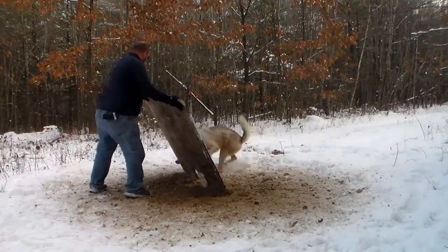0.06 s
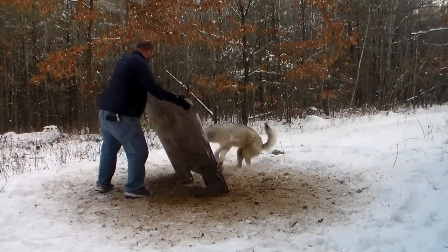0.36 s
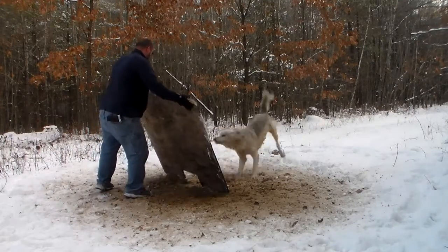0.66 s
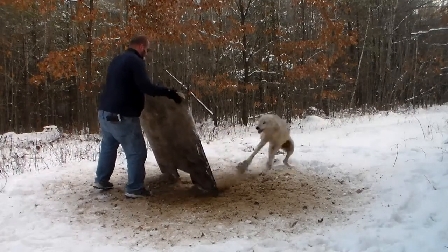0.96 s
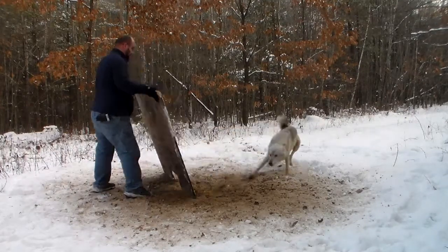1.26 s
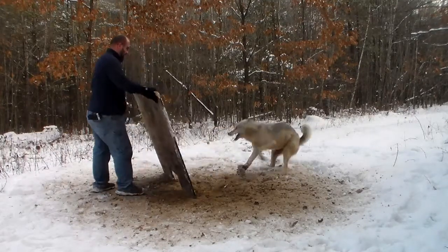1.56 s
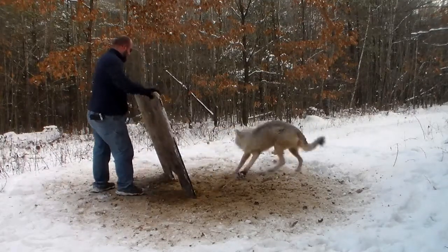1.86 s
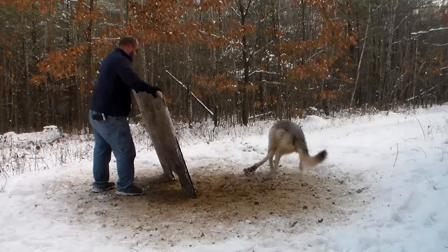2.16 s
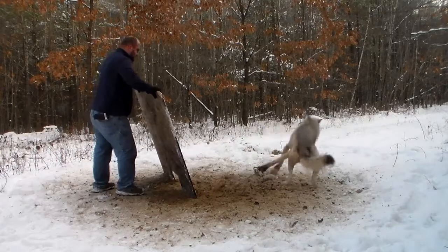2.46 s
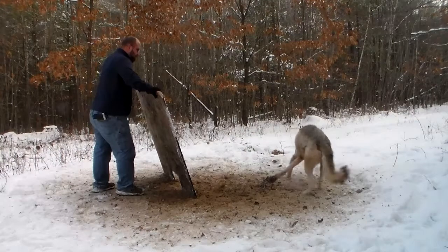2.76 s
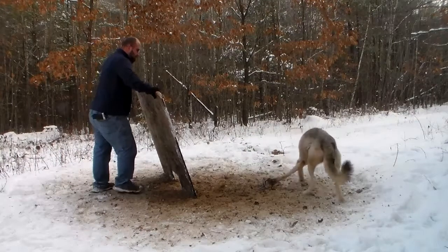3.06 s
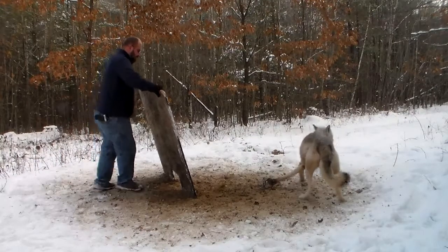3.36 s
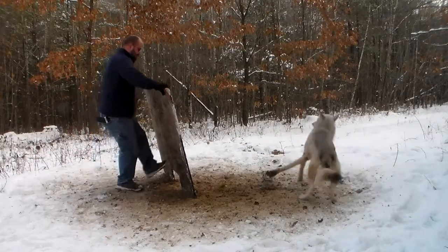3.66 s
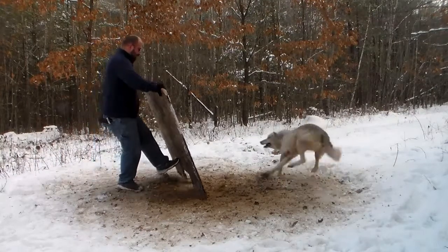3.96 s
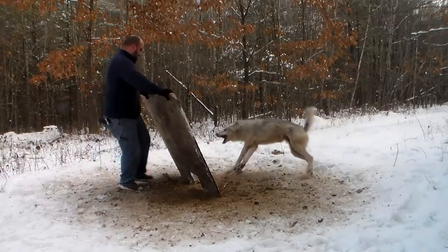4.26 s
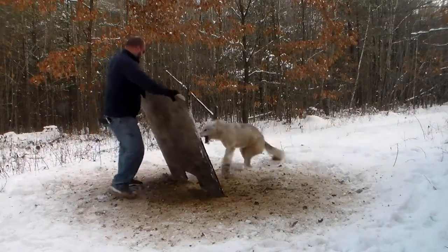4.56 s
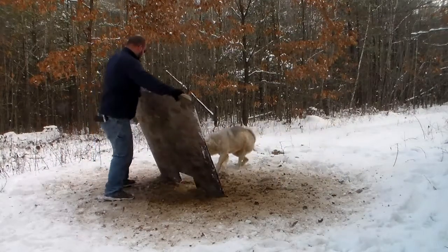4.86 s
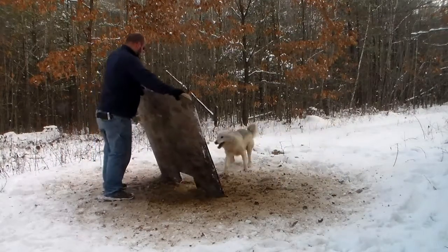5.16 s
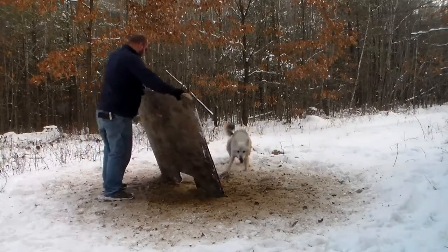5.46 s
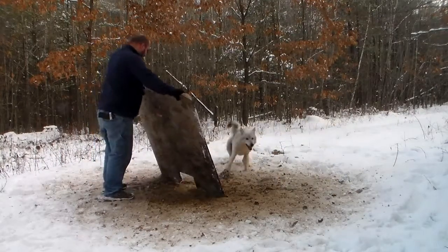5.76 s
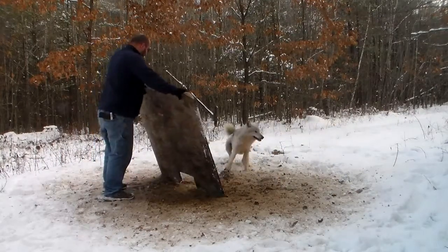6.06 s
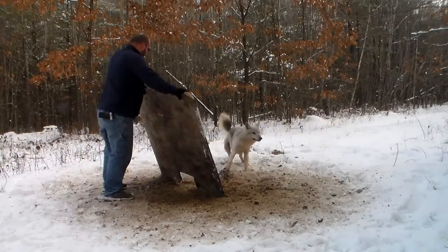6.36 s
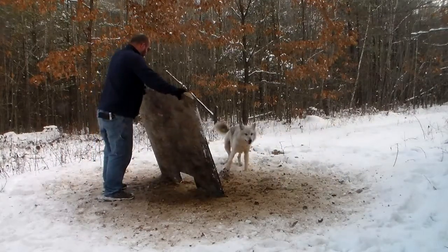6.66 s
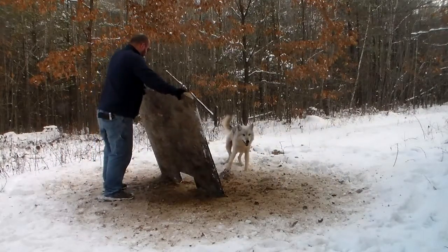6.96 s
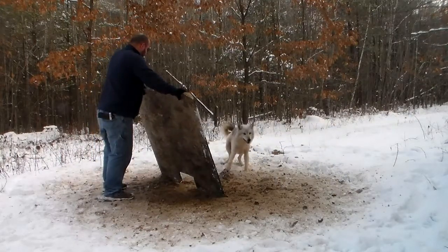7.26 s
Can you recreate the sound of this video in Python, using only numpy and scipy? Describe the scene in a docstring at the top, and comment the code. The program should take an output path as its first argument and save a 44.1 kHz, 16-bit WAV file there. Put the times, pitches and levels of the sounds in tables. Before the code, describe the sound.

A steel chain clicks and clinks as a trapped wolf lunges and scuffs in snow, while a wooden board scrapes over frozen ground.

```python
"""A steel chain and foothold trap click and clink as a trapped wolf lunges about a snowy clearing,
a few metres in front of a stereo microphone. Links snap taut and ring the trap; slack ones tick between.
Paws thud and scuff in snow and dirt. A man drags a wooden board over the frozen ground, where its edge
scrapes and groans, and kicks it once. The trees give a faint echo; under it all lie a low hum and a
soft hiss."""
import sys
import numpy as np
from scipy import signal
from scipy.fft import rfft, irfft, next_fast_len
from scipy.io import wavfile
from scipy.ndimage import map_coordinates

SR = 44100
rng = np.random.default_rng(int(sys.argv[2]) if len(sys.argv) > 2 else 0)


def transcribe(u):
    """Save the signal u as a 16-bit wav file named by the first command-line argument.

    u: samples, shape (n,) or (channels, n), limited to [-1, 1]; the rate is SR.
    q: integer samples, one column per channel.
    """
    v = np.clip(np.atleast_2d(u).T, -1, 1)
    q = np.round(v * 32767).astype(np.int16)
    wavfile.write(sys.argv[1], SR, q)


N = 331367


def amp(db):
    """Decibels to gain."""
    return 10 ** (np.asarray(db) / 20)


def unit(x):
    """x scaled to rms 1."""
    return x / np.sqrt(np.mean(x ** 2) + 1e-20)


def along(points, hz):
    """(Hz, value) points read on a log frequency axis."""
    knots_hz, values = np.transpose(points)
    return np.interp(np.log(hz + 1), np.log(knots_hz + 1), values)


def during(rows):
    """1 from the first row's time to the last row's, with 50 ms fades outside."""
    t = np.arange(N) / SR
    return np.clip(np.minimum(t - rows[0][0], rows[-1][0] - t) / .05 + 1, 0, 1)


def wobble(rate):
    """A smooth random curve with rate knots a second."""
    knots = rng.standard_normal(int(N * rate / SR) + 4)
    return map_coordinates(knots, [np.arange(N) * rate / SR])


def filtered(x, response):
    """x through a complex frequency response."""
    size = next_fast_len(N + SR // 2)
    return irfft(rfft(x, size) * response(np.fft.rfftfreq(size, 1 / SR)), size)[..., :N]


def coloured(x, spectrum):
    """x shaped by (Hz, dB) points, at rms 1."""
    return unit(filtered(x, lambda hz: amp(along(spectrum, hz))))


def minimum_phase(gain):
    """The fastest-starting pulse that has this spectrum."""
    cepstrum = irfft(np.log(gain + 1e-6))
    half = len(cepstrum) // 2
    cepstrum[1:half] *= 2
    cepstrum[half + 1:] = 0
    return irfft(np.exp(rfft(cepstrum)))


def add(track, start, sound):
    """Lay a sound into the track, start seconds in."""
    i = max(round(start * SR), 0)
    track[i:i + len(sound)] += sound[:N - i]


def grains(per_s, scatter_db, smooth):
    """Tiny fractures at random times and sizes, over a share of smooth sliding noise."""
    size = amp(scatter_db * np.minimum(rng.exponential(size=N), 4))
    breaks = (rng.random(N) < per_s / SR) * size * rng.choice([-1, 1], N)
    return unit(unit(breaks) + smooth * rng.standard_normal(N))


# The quiet of the clearing. Each row: frequency in Hz, relative level in dB.
AIR_SPECTRUM = [(12, -19), (22, -32), (34, -25), (44, -20.5), (60, -9), (86, -17.5), (214, -22.5),
                (450, -25.5), (719, -28), (1690, -32), (10100, -37), (12300, -35), (14500, -43.5)]
# How alike that air is at the two ports. Each row: frequency in Hz, left-right correlation.
AIR_LIKENESS = [(30, 0.27), (60, 0.11), (130, 0.17), (290, 0.062), (630, 0.065), (1400, 0.092),
                (6000, 0.01)]


def air_and_hum(air_db=-63, hum_db=-59.5, hum_hz=30.5):
    """Still winter air and microphone hiss spread wide, with a low wavering hum in the centre."""
    def mid_and_side(hz):
        side_gain = np.tan(np.arccos(along(AIR_LIKENESS, hz)) / 2)
        return amp(along(AIR_SPECTRUM, hz)) * np.array([np.ones_like(hz), side_gain])

    mid, side = filtered(rng.standard_normal((2, N)), mid_and_side)
    air = np.array([mid + side, mid - side]) / np.std(mid)
    phase = 2 * np.pi * np.cumsum(hum_hz + 1.64 * wobble(9)) / SR
    hum = unit(np.sin(phase) * amp(1.7 * wobble(9)))
    return amp(air_db) * air + amp(hum_db) * hum


# Two drags over the frozen ground, a curve for each. Each row: time in seconds, relative level in dB.
BOARD_DRAGS = [
    [(0.0, -61), (0.142, -72), (0.148, -47.5), (0.222, -40), (0.316, -48.5), (0.396, -46.5), (0.658, -51.5),
     (0.684, -58), (0.898, -63), (1.054, -56), (1.25, -77)],
    [(4.3, -64), (4.34, -69.5), (4.476, -51), (4.656, -49.5), (4.688, -76), (4.694, -49), (4.76, -40),
     (4.822, -47), (4.858, -66), (4.874, -50.5), (5.0, -90)],
]
# The wood's resonances. Each row: frequency in Hz, width in Hz, gain in dB in drag one, then in drag two.
BOARD_MODES = [(139, 180, -2.5, -2), (259.3, 25, 4.5, -1), (462, 250, -2, -7), (624, 31, -10, 5.5),
               (738, 29, -2, -0.5), (1066, 36, -2, 1.5), (1221, 21, -1.5, -3.5), (1540, 880, -13, -35),
               (2440, 230, -8, -7)]


def board_scrape(drag_db=-1, grit_db=-22):
    """Grit catches on the board's edge; each resonance is fed by its own stream of catches."""
    out, t = np.zeros(N), np.arange(N) / SR
    for k, drag in enumerate(BOARD_DRAGS):
        grit = grains(per_s=830, scatter_db=1.6, smooth=0.99)
        scrape = amp(grit_db) * filtered(grit, lambda f: f / (60 + f) / (1 + (f / 1300) ** 4))
        for hz, width, *gains_db in BOARD_MODES:
            def mode(f):
                resonance = 1j * f * width / (hz * hz - f * f + 1j * f * width)
                return resonance / (1 + (f / (2 * hz)) ** 4)

            catches = grains(per_s=900, scatter_db=4.9, smooth=0.63)
            scrape += amp(gains_db[k]) * filtered(catches, mode)
        level_db = np.interp(t, *np.transpose(drag)) + drag_db + 3.6 * wobble(35)
        out += during(drag) * amp(level_db) * unit(scrape)
    return out


# Paws sliding in snow and dirt. Each row: start and length in seconds, rustle and spray in relative dB.
PAW_SLIDES = [(.01, .09, -53, -63), (0.127, 0.085, -43, -54.5), (.26, 0.41, -49.5, -58.5),
              (0.69, 0.12, -60.5, -61), (0.981, 0.028, -54.5, -54), (1.122, 0.032, -56, -55),
              (1.366, 0.038, -59.5, -69), (1.503, 0.15, -59.5, -64), (1.789, 0.065, -58.5, -66),
              (1.977, 0.028, -58, -63.5), (2.25, 0.012, -59, -58), (2.372, 0.044, -62.5, -64.5),
              (2.528, 0.015, -67, -68), (2.696, .02, -65, -67), (2.856, 0.0089, -73, -63.5),
              (3.018, 0.085, -69.5, -63), (3.6, 0.017, -64.5, -69), (3.794, 0.064, -58, -63),
              (3.94, 0.012, -62, -66), (4.081, 0.148, -59.5, -58), (4.439, 0.082, -49, -63),
              (4.57, 0.073, -52, -59), (4.75, 0.05, -43.5, -52.5), (4.865, 0.076, -60, -63),
              (5.103, 0.014, -62, -62), (5.187, .01, -63, -69), (5.278, 0.013, -63, -68),
              (5.421, 0.016, -60.5, -69), (5.788, 0.012, -71, -85)]
BUSY_DB = -62  # above this rustle, the paws stir the slack chain


def paw_slides(rise_db_per_s=335, fall_db_per_s=204):
    """Gains of rustle and spray over time: each slide bites quickly, holds and settles more slowly."""
    t, power = np.arange(N) / SR, np.zeros((2, N))
    for start, length, rustle_db, spray_db in PAW_SLIDES:
        near = slice(max(round((start - .5) * SR), 0), round((start + length + .5) * SR))
        fade_db = rise_db_per_s * np.maximum(start - t[near], 0)
        fade_db += fall_db_per_s * np.maximum(t[near] - start - length, 0)
        power[:, near] += np.outer(amp([rustle_db, spray_db]), amp(-fade_db)) ** 2
    return np.sqrt(power)


# Churned snow and the fine spray off it. Each row: frequency in Hz, relative level in dB.
RUSTLE_SPECTRUM = [(500, -5.5), (1100, -4.5), (1650, -4), (2000, -5.5), (2500, 1), (3050, -2), (3400, 2.5),
                   (4000, 3.5), (4600, -3.5), (6000, -13), (6950, -13.5), (7900, -24), (11000, -58)]
SPRAY_SPECTRUM = [(2000, -29), (5000, -6), (7000, -1.5), (8100, -9), (9700, -2), (12000, -8), (14500, -6)]


def scuffs(rustle, spray, spray_db=-1, patter_db=-66, shuffle_db=-75, dust_db=-73):
    """Crust and grit break under sliding paws and throw up a spray; the soft pads patter dully."""
    grit = coloured(grains(per_s=2600, scatter_db=2.9, smooth=.65), RUSTLE_SPECTRUM)
    churn = (rustle + amp(shuffle_db)) * amp(2.97 * wobble(90)) * grit
    dust = coloured(grains(per_s=3300, scatter_db=3, smooth=0.59), SPRAY_SPECTRUM)
    fine_spray = (spray + amp(dust_db)) * amp(spray_db) * dust
    pad_spectrum = [(45, -14), (70, -2), (150, 0), (280, -10), (600, -21), (1500, -45)]  # Hz, dB
    pads = amp(3 * wobble(14)) * coloured(rng.standard_normal(N), pad_spectrum)
    # the harder the paws work, the heavier they fall: 0.18 dB for each dB of rustle
    patter = amp(patter_db) * (rustle / amp(BUSY_DB)) ** 0.18 * pads
    return during(PAW_SLIDES) * (churn + fine_spray + patter)


def slack_ticks(rustle, per_s=20, db=-54.5, hz=3850, octaves=0.32, treble_db=-16, ring_db=-15):
    """Faint contacts for the chain at random moments, wherever the paws churn hard enough to stir it."""
    chances = rng.random((300, 4))
    share = per_s * N / SR / len(chances)
    return [(when * N / SR, db + 8 * (size - .5), hz * 2 ** (.5 * (pitch - .5)),
             octaves, treble_db, ring_db)
            for when, size, pitch, odds in chances
            if odds < share and rustle[int(when * N)] > amp(BUSY_DB)]


# The bright edge of a steel click. Each row: frequency in Hz, relative level in dB.
SNAP_SPECTRUM = [(300, -12.5), (1200, -3.5), (3000, 2.5), (5500, -2), (6800, 2.5), (8100, -13.5), (9000, 0),
                 (10000, -1), (11500, -6.5), (14500, -19)]


def contact_pulse(centre_hz, octaves, treble_db):
    """One link strikes another; the hardness of the contact sets the band that is excited."""
    hz = np.fft.rfftfreq(1024, 1 / SR) + 1
    snap = amp(along(SNAP_SPECTRUM, hz))
    snap /= np.linalg.norm(snap[hz > 8200])
    band = np.exp(-(np.log2(hz / centre_hz) / (2.05 * octaves)) ** 2)
    pulse = minimum_phase(np.hypot(band / np.linalg.norm(band), amp(treble_db) * snap))
    # each frequency takes its own path through the links, up to two milliseconds long
    delay = np.interp(hz, np.linspace(0, SR / 2, 30), .0002 + .0018 * rng.random(30) ** 2)
    pulse = irfft(rfft(pulse) * np.exp(-2j * np.pi * np.cumsum(delay) * SR / len(pulse)))
    t = np.arange(len(pulse)) / SR
    return pulse * np.clip(2 - t / .005, 0, 1)


def steel_ring(modes, t, detune):
    """Damped modes, at new strengths for each blow; the grip of the chain shifts their pitch."""
    ring = np.zeros(len(t))
    for hz, db, t60 in modes:
        decay = amp(db + rng.normal(0, 1.1) - 60 * t / t60)
        ring += decay * np.sin(2 * np.pi * (hz * rng.normal(1, detune) * t + rng.random()))
    return ring * (1 - np.exp(-t / 0.00058))


# The chain jerks taut, steel on steel. Each row: start in seconds, click level in dB, centre in Hz,
# spread in octaves, then the treble and the trap's ring in relative dB.
CHAIN_JERKS = [(0.102, -27, 2710, 0.13, -26.5, -19), (.1306, -38, 3500, 0.25, -21, -13),
               (0.1503, -27.5, 3300, 0.31, -25.5, -23), (.215, -34, 2900, .38, -21, -21),
               (0.263, -28.5, 3700, .22, -24, -14.5), (0.3438, -34, 2980, 0.36, -12.5, -22),
               (.4795, -29.5, 3100, .31, -26, -27), (.483, -32, 2980, 0.56, -22, -22),
               (0.493, -29.5, 3280, .28, -22, -14), (0.6231, -29.5, 3130, 0.32, -19.5, -17),
               (.679, -43, 3440, 0.67, 1, -14), (0.692, -32, 3770, 0.13, -13, -31),
               (0.9664, -23.5, 5000, 0.11, -15, -30), (.967, -27.5, 3200, 0.14, -14.5, -23),
               (1.0336, -43.5, 3590, .44, -15, -23), (1.0631, -26.5, 2640, 0.31, -19, -19),
               (1.0836, -45, 2840, 0.52, -14, -25), (1.1173, -46, 3620, 0.41, -14, -20),
               (1.2935, -47, 3830, 0.18, -23, -23), (1.4773, -34.5, 3130, 0.44, -16, -25),
               (1.4806, -30, 3550, 0.28, -12, -16), (1.4848, -25.5, 2850, 0.34, -16.5, -18),
               (1.4938, -39, 3000, .44, -14, -28), (1.7993, -27.5, 4000, 0.082, -11.5, -19),
               (1.8035, -26.5, 3070, 0.3, -25, -18), (1.9112, -50, 3630, 0.22, -16, -13),
               (2.0623, -31.5, 3270, 0.29, -27, -25), (2.1048, -47.5, 3780, 0.15, -18, -10),
               (2.2347, -30, 2800, .25, -14, -19), (2.2379, -32.5, 3440, 0.29, -12, -6),
               (2.534, -38.5, 4120, 0.071, -12.5, -11), (2.6713, -38, 3140, .29, -10.5, -16),
               (3.7413, -48.5, 3420, 0.19, -20, -25), (3.7477, -46, 3230, 0.51, -23, -15),
               (3.8185, -42, 3700, 0.13, -9, -26), (3.8218, -35.5, 2070, .43, -17, -21),
               (4.018, -54, 4100, 0.091, -15, -8), (4.0502, -42.5, 3670, 0.15, -15.5, -12),
               (4.0774, -41, 3980, 0.095, -13, -24), (4.1445, -35.5, 3740, 0.16, -15, -17),
               (4.1817, -40, 3300, 0.31, -18, -11), (4.234, -40.5, 3280, 0.27, -27, -26),
               (4.34, -47, 2710, .28, -19.5, -20), (4.3773, -44, 3000, 0.37, -29, -13),
               (4.4639, -30, 3840, 0.13, -13, -24), (4.5083, -36, 3300, 0.27, -31, -17),
               (4.6112, -36, 4070, 0.32, -11, -12), (4.7683, -22.5, 2830, 0.11, -16.5, -20),
               (4.8152, -41.5, 3880, .083, -24, -12), (4.878, -44, 3900, 0.31, -21, -23),
               (4.9303, -40.5, 3830, .19, -19, -18), (5.1855, -38.5, 3760, 0.22, -14, -27),
               (5.355, -49, 4700, 0.2, -16, -22), (5.418, -42.5, 3070, 0.33, -25, -25),
               (5.4274, -28, 2810, 0.28, -19, -33)]
# The struck trap's modes. Each row: frequency in Hz, relative level in dB, seconds to fall 60 dB.
TRAP_MODES = [(2560, 3, 0.029), (3700, -8, .05), (4125, 12.5, 0.038), (4800, -7.5, 0.092),
              (6340, -7, 0.058), (7080, -6.5, 0.07), (9060, -6, 0.061)]


def chain(rustle, chatter_db=-7, chatter_t60=0.021, shiver_db=-20, shiver_t60=0.1, ring_lift_db=1):
    """Links snap together in millisecond clicks; their neighbours chatter and the trap rings briefly."""
    out, t = np.zeros(N), np.arange(SR // 3) / SR
    for start, db, centre_hz, octaves, treble_db, ring_db in CHAIN_JERKS + slack_ticks(rustle):
        pulse = contact_pulse(centre_hz, octaves, treble_db)
        force = signal.unit_impulse(len(t))
        for rattle_db, t60 in (chatter_db, chatter_t60), (shiver_db, shiver_t60):
            rattle = rng.standard_normal(len(t)) * amp(-60 * t / t60) * (1 - np.exp(-t / 0.00067))
            force += amp(rattle_db) * rattle / np.linalg.norm(rattle)
        click = signal.fftconvolve(force, pulse)[:len(t)]
        click *= np.sqrt(.003 * SR) / np.linalg.norm(click)  # the energy of 3 ms at rms 1
        ring = amp(ring_db + ring_lift_db) * steel_ring(TRAP_MODES, t, detune=0.0092)
        add(out, start, amp(db) * (click + ring))
    return out


# Blows on the ground and the board. Each row: start in seconds, level in dB, pitch in Hz.
BLOWS = [(0.212, -35.5, 156), (.405, -38.5, 147), (0.52, -45, 75.6), (0.619, -45, 72), (0.737, -47, 89),
         (1.038, -43, 143), (1.599, -47, 152), (1.801, -39.5, 79), (2.369, -42.5, 139), (3.099, -47, 143),
         (3.373, -46, 317), (3.417, -50, 385), (3.821, -38.5, 86), (3.823, -42, 170), (3.975, -36, 166),
         (4.014, -49.5, 111), (4.466, -41, 128), (4.618, -39, 143.4), (4.749, -49, 75), (4.863, -46, 129),
         (5.261, -40.5, 180)]


def thuds(dirt_db=-9, decay_cycles=11.4):
    """Each heavy blow is a short low swing with a puff of dull noise; the lower, the longer."""
    out, t = np.zeros(N), np.arange(SR // 4) / SR
    dirt = coloured(rng.standard_normal(N), [(40, -14), (150, -2), (450, -13.5), (900, -21), (2500, -30)])
    for start, db, hz in BLOWS:
        puff = amp(dirt_db) * dirt[round(start * SR):][:len(t)]
        envelope = amp(db - 60 * t * hz / decay_cycles) * (1 - np.exp(-t / 0.00034))
        add(out, start, envelope * (np.sin(2 * np.pi * hz * t) + puff))
    return out


# Hoarse groans in the first drag. Each row: start and length in seconds, first and last pitch in Hz,
# level in dB.
BOARD_GROANS = [(0.292, 0.1, 491, 405, -58), (0.373, 0.15, 465, 330, -49), (0.476, 0.16, 450.6, 361.4, -49),
                (0.534, 0.156, 331, 282, -54), (0.609, 0.079, 476, 406, -51)]


def board_groans(overtone_db=-9, jitter=0.022, rough_db=3):
    """Pressed hard, the board's edge sticks and slips in short, rough, overlapping, falling tones."""
    out = np.zeros(N)
    for start, length, first_hz, last_hz, db in BOARD_GROANS:
        progress = np.linspace(0, 1, round(length * SR))
        glide_hz = first_hz + (last_hz - first_hz) * progress
        pitch = glide_hz * (1 + jitter * wobble(134)[:len(progress)])
        phase = 2 * np.pi * np.cumsum(pitch) / SR
        tone = np.sin(phase) + amp(overtone_db) * np.sin(3 * phase)
        roughness = amp(rough_db * wobble(91)[:len(progress)])
        swell = np.sqrt(np.abs(np.sin(np.pi * progress)))
        add(out, start, amp(db) * swell * unit(tone * roughness))
    return out


# Paws and boots sinking in, and the man's kick at the board at 3.824 s. Each row: peak time in seconds,
# relative level in dB, half-width in seconds.
STEPS_AND_KICK = [(0.922, -47, 0.018), (1.294, -49, .008), (1.57, -55.5, 0.083), (1.998, -55.5, 0.038),
                  (2.383, -53, 0.021), (2.858, -52.5, 0.0084), (3.109, -51, .02), (3.339, -52, 0.01),
                  (3.378, -53.5, 0.012), (3.603, -52, 0.014), (3.824, -34, 0.0022), (3.977, -53.5, .0045),
                  (4.142, -50, 0.016), (4.184, -46, 0.012), (4.893, -48.5, 0.011), (5.102, -53, 0.027)]
# Crushed crust and dirt. Each row: frequency in Hz, relative level in dB.
CRUNCH_SPECTRUM = [(60, 10.5), (300, -10), (600, -2.5), (900, -9), (1500, -3.5), (2600, -9), (4200, -7),
                   (6000, -21), (8000, -16), (9800, -25), (14500, -40)]


def crunches_and_kick(step_db=-2):
    """A deep step breaks through the crust and crunches in the dirt; the kick at the board crunches the same
    way."""
    t = np.arange(N) / SR
    weight = sum(amp(db + step_db) * np.exp(-((t - peak) / width) ** 2) for peak, db, width in STEPS_AND_KICK)
    return weight * coloured(grains(per_s=2500, scatter_db=2.8, smooth=1), CRUNCH_SPECTRUM)


# A free-hanging link is flicked. Each row: start in seconds, relative level in dB.
LINK_FLICKS = [(4.144, -51), (5.186, -53), (5.355, -55.5), (5.426, -40)]
# That link's modes. Each row: frequency in Hz, relative level in dB, seconds to fall 60 dB.
LINK_MODES = [(1900, -7, 0.084), (2160, -12, 0.15), (2850, -26, .13), (4790, 1.5, 0.16), (6900, -14, 0.14),
              (8850, -20, 0.19)]


def clinks():
    """A loose link rings out on its own modes, longer and truer than the trap."""
    out, t = np.zeros(N), np.arange(SR // 3) / SR
    for start, db in LINK_FLICKS:
        add(out, start, amp(db) * steel_ring(LINK_MODES, t, detune=.0005))
    return out


def tree_echo(x, t60=0.56, echo_db=-24):
    """Trunks round the clearing scatter a thin echo, different on each side of the microphone."""
    t = np.arange(SR) / SR
    tail = rng.standard_normal((2, SR)) * amp(-60 * t / t60) * (1 - np.exp(-t / 0.0038))
    tail /= np.linalg.norm(tail[0])
    return amp(echo_db) * signal.fftconvolve(x[None], tail, axes=1)[:, :N]


def housing_scatter(x, delay_s=.0011):
    """The side signal: treble scatters off the housing, differently into each microphone port."""
    width = [(100, -17), (2500, -46), (4500, -18), (7000, -4.5), (10000, -4), (14000, -2.5)]  # Hz, dB
    return filtered(x, lambda hz: 1j * amp(along(width, hz)) * np.exp(-2j * np.pi * hz * delay_s))


def scene():
    """The microphone stands in the clearing with all the action straight ahead, a few metres off."""
    rustle, spray = paw_slides()
    solids = thuds() + board_scrape() + board_groans() + clinks() + chain(rustle)
    mid = solids + scuffs(rustle, spray) + crunches_and_kick()
    # grit flies to both sides, so the side signal has grains of its own
    side = housing_scatter(solids + scuffs(rustle, spray) + crunches_and_kick())
    return np.array([mid + side, mid - side]) + tree_echo(mid) + air_and_hum()


def record(dry):
    """The microphone's left port is a little stronger in bass and top; nothing passes above 14.4 kHz."""
    left_over_right = [(30, 1), (70, 1.5), (250, 0.56), (1000, 0.19), (4500, -0.39), (8000, -0.21),
                       (10000, 1.4), (14000, 0.8)]  # Hz, dB
    return filtered(dry, lambda hz: amp(np.outer([.5, -.5], along(left_over_right, hz))) * (hz < 14400))


dry = scene()
out = record(dry)
transcribe(out)
```